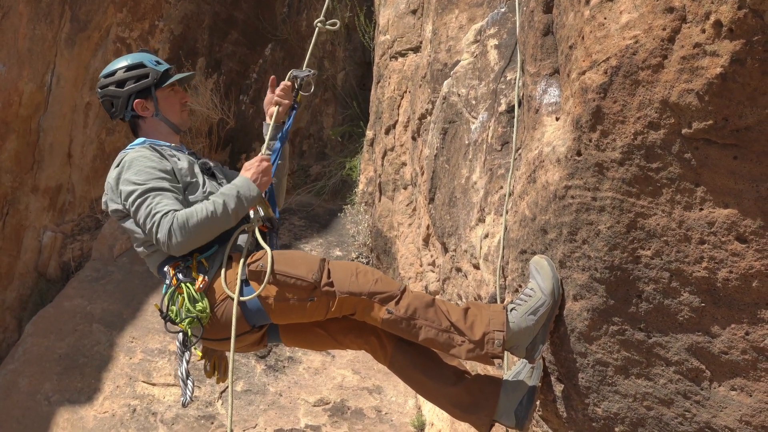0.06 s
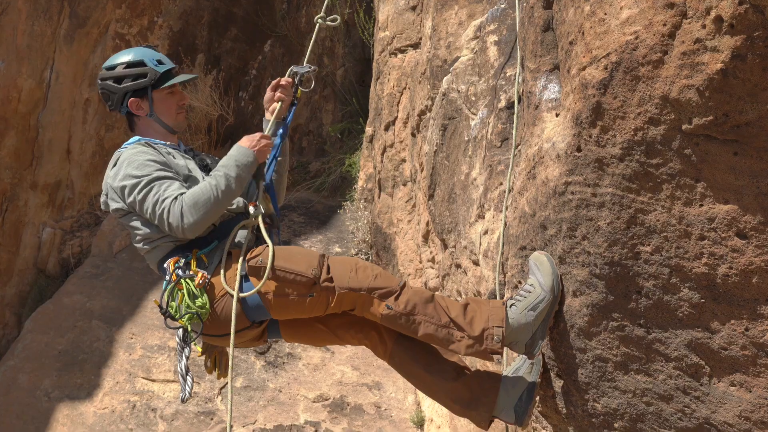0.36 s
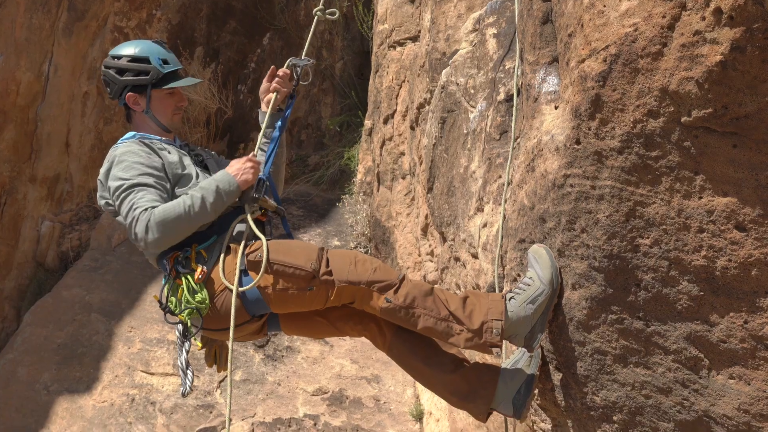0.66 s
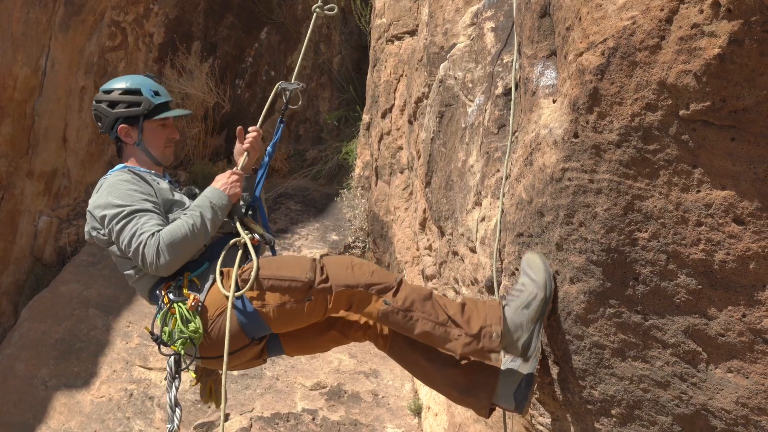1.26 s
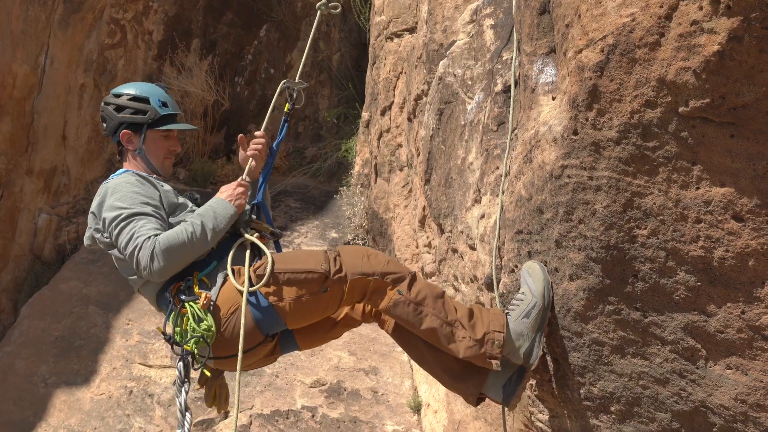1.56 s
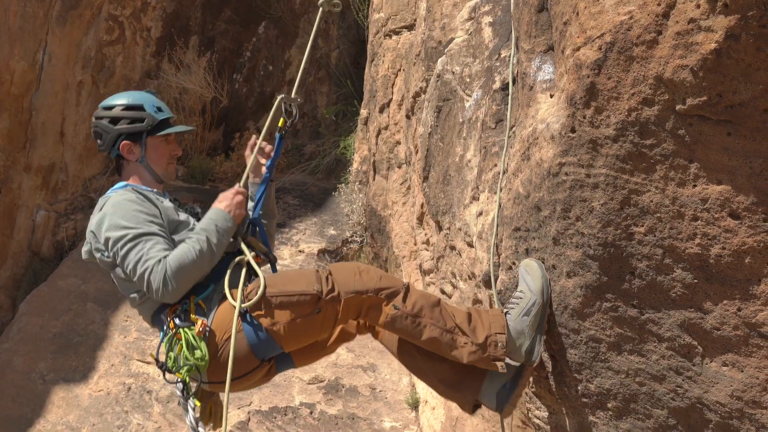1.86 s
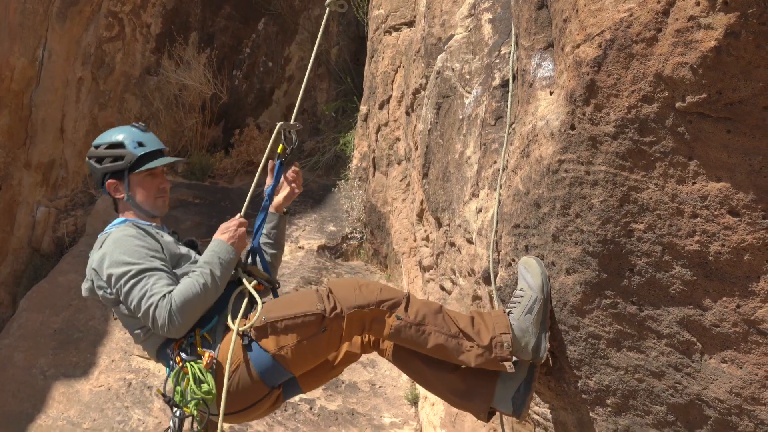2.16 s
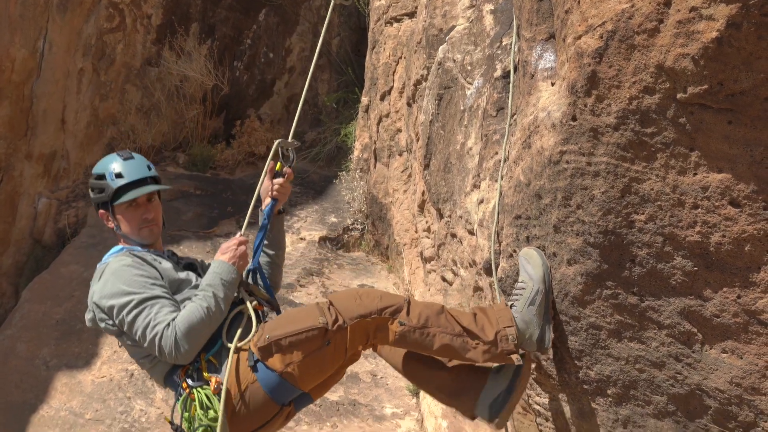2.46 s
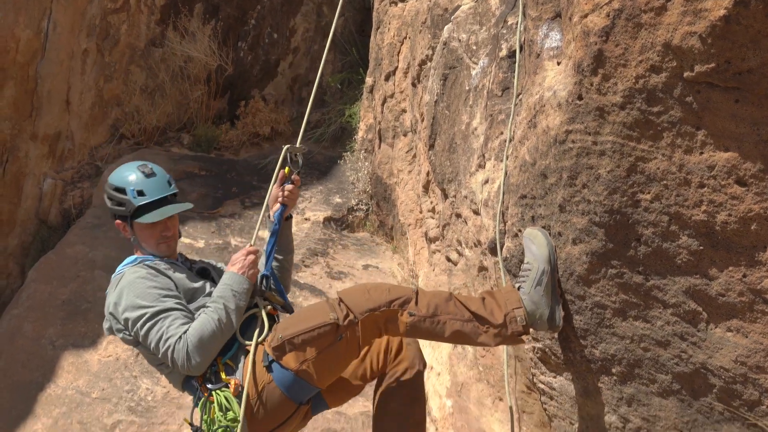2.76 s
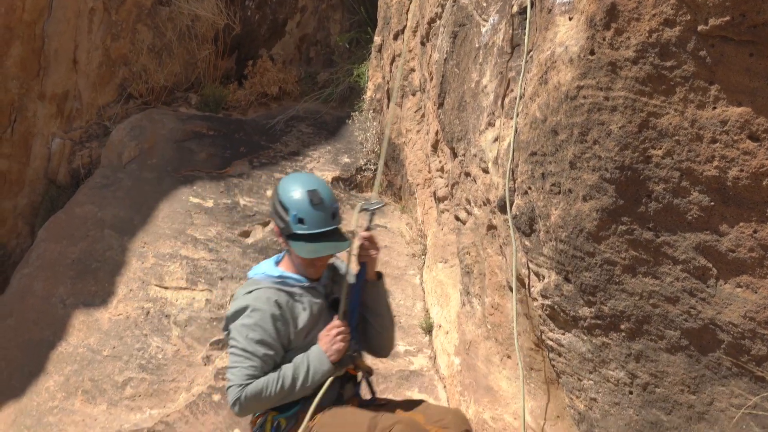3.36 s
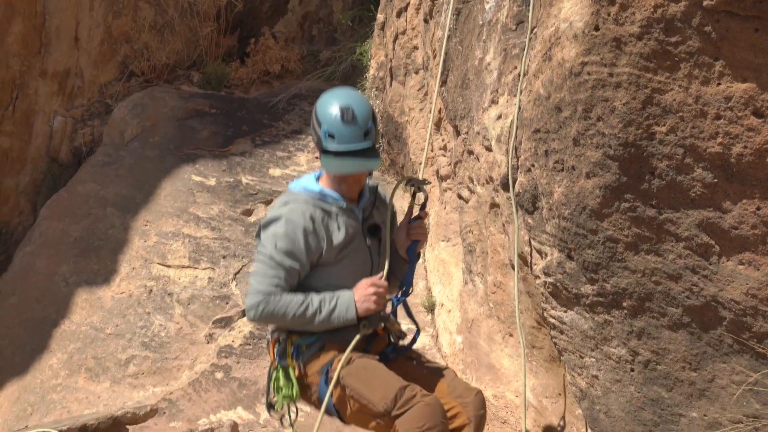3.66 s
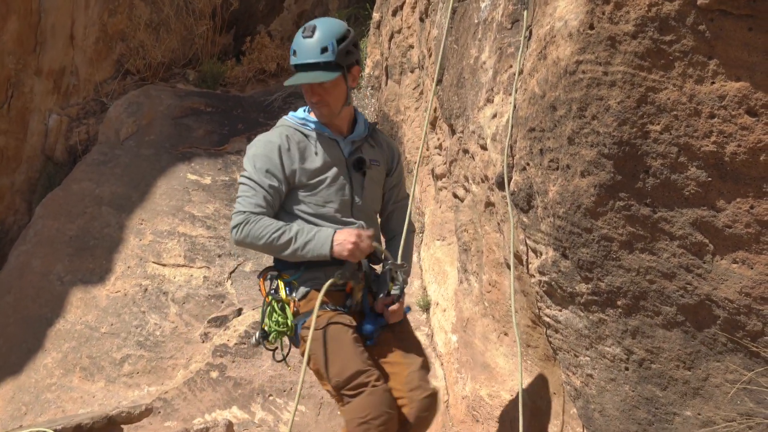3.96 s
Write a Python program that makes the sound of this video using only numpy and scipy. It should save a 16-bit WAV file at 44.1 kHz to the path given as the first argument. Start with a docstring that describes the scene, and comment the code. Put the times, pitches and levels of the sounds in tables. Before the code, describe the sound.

Soft surges of rope sliding through a belay device as carabiners clink and shoes knock.

```python
"""Outdoors at a sandstone wall, a climber lowers down. Rope hisses and rasps in surges as its fibres
slip through a metal belay device. Carabiners, a buckle and the device snap and ring as metal meets
metal. Rubber soles knock on the rock, shoes and clothing scuff, and a woven sling zips over an edge
near the end. The wall throws these hits back; under it all lie a faint rustle and low open air."""
import sys
import numpy as np
from scipy import signal
from scipy.fft import rfft, irfft
from scipy.io import wavfile
from scipy.ndimage import uniform_filter1d

SR = 44100
rng = np.random.default_rng(int(sys.argv[2]) if len(sys.argv) > 2 else 0)


def put_to_file(sound):
    """Save the sound as 16-bit audio at rate SR, in the file named by the first command-line argument."""
    columns = np.atleast_2d(sound).T  # one column per channel
    safe = np.clip(columns, -1, 1)
    whole_steps = np.round(safe * 32767)
    wavfile.write(sys.argv[1], SR, whole_steps.astype(np.int16))


N = 176400
T = np.arange(N) / SR

# Rope surges, levels before the layer trims
# (start [s], end [s], hiss [dB], treble [dB], rasp [dB], rasp centre [Hz])
ROPE_SURGES = [(-.05, 0.095, -47.5, -47, -44.5, 3780), (0.213, .35, -67, -63, -63, 3570),
               (0.418, 0.493, -56, -61, -52, 3150), (0.493, .56, -52.5, -58, -41.5, 3280),
               (.56, .65, -48.5, -52.5, -44.5, 3770), (.65, 0.771, -50.5, -51, -44.5, 3500),
               (0.836, 0.96, -54, -57, -54.5, 3360), (1.015, 1.082, -50.5, -73.5, -47, 3500),
               (1.1, 1.17, -60, -50.5, -48, 3150), (1.166, 1.234, -65, -52.5, -59, 3170),
               (1.247, 1.365, -59, -63, -49, 2960), (1.448, 1.583, -51, -56, -48.5, 3150),
               (1.64, 1.78, -61, -58.5, -52.5, 3060), (1.81, 1.884, -45.5, -55, -44.5, 4600),
               (1.918, 2, -45, -47, -42, 3050), (2.006, 2.152, -47.5, -51, -46, 3180),
               (2.15, 2.274, -51, -55.5, -46, 3030), (2.305, 2.45, -51.5, -53.5, -49.5, 3115),
               (2.451, 2.6, -46, -48.5, -45.5, 3330), (2.605, 2.713, -51, -62, -50, 3130),
               (2.698, 2.864, -47.5, -53.5, -50, 3200), (2.872, 3.132, -43, -47, -45.5, 3320),
               (3.124, 3.297, -41, -47.5, -42, 3330), (3.29, 3.377, -44, -51, -46.5, 3500),
               (3.378, 3.48, -50.5, -60, -48.5, 3160), (3.487, 3.615, -48, -57, -55, 3480),
               (3.65, 3.748, -57.5, -61, -50, 3000), (3.874, 4.05, -56, -48, -55, 3400)]
# EQ of the rope's wide hiss (frequency [Hz], gain [dB])
HISS_EQ = [(600, -22), (1100, -13), (1700, -2.5), (2200, -2), (4200, -2), (6500, -1.5), (9500, -7),
           (12000, -11.5), (16000, -40)]
# EQ of the rope's fine top end (frequency [Hz], gain [dB])
TREBLE_EQ = [(6000, -24), (9000, -4), (11500, -5), (14500, -1), (16000, -11)]
# Metal hits (time [s], piece, snap gain [dB], snap centre [Hz], ring gain [dB], ring centre [Hz])
METAL_HITS = [(.008, "carabiner", -25.5, 3780, -33, 7200), (.033, "carabiner", -31, 5900, -27.5, 9960),
              (.059, "carabiner", -24, 5900, -18.5, 10030), (0.0624, "carabiner", -22, 8000, -26, 7200),
              (.068, "carabiner", -12.5, 7840, -22, 5920), (0.081, "carabiner", -40, 8600, -35, 3900),
              (.169, "carabiner", -30.5, 1840, -32.5, 7490), (0.341, "carabiner", -30.5, 5130, -35.5, 7300),
              (0.434, "carabiner", -40, 7960, -38.5, 5270), (.528, "device", -17.5, 9250, -30.5, 3050),
              (0.6551, "device", -28, 6800, -40, 10700), (0.8902, "carabiner", -18.5, 5840, -23, 9960),
              (.915, "carabiner", -47, 9900, -38, 5270), (0.937, "carabiner", -28.5, 5650, -30.5, 3560),
              (.946, "carabiner", -36, 7500, -36.5, 5270), (.951, "carabiner", -28, 6840, -53.5, 5270),
              (0.986, "carabiner", -31, 2340, -32.5, 5530), (1.009, "carabiner", -21, 7750, -36, 7300),
              (1.047, "carabiner", -33, 7500, -39, 5270), (1.1489, "carabiner", -29, 3600, -35.5, 5300),
              (1.226, "carabiner", -37, 7340, -46, 5270), (1.255, "carabiner", -43, 6500, -61, 9960),
              (1.326, "carabiner", -39.5, 6060, -56, 5270), (1.579, "carabiner", -35.5, 3180, -58.5, 3560),
              (1.818, "device", -23.5, 8670, -39, 9300), (1.845, "carabiner", -21, 8000, -36.5, 5270),
              (2.335, "carabiner", -33.5, 7300, -44, 5270), (3.002, "carabiner", -27, 8300, -48, 8150),
              (3.505, "carabiner", -30, 7700, -49, 8150), (3.553, "buckle", -33, 9200, -44, 6570),
              (3.596, "buckle", -32, 12300, -43.5, 3830), (3.655, "carabiner", -32, 3020, -40.5, 5270),
              (3.671, "carabiner", -33, 5600, -38, 7200), (3.6905, "carabiner", -27, 5300, -36, 7200),
              (3.729, "buckle", -31.5, 3640, -34, 14100), (3.733, "buckle", -34, 8600, -33.5, 6570),
              (3.776, "buckle", -45.5, 11020, -52, 8700), (3.884, "carabiner", -30, 7100, -30.5, 7300),
              (3.898, "carabiner", -32, 3700, -38, 3520), (3.932, "device", -24, 2800, -48, 5000),
              (3.939, "device", -20, 11100, -19, 12340), (3.941, "device", -20.5, 9460, -35, 6040),
              (3.9668, "device", -21, 6800, -22, 10740), (3.980, "device", -27, 7200, -30, 10740),
              (3.987, "device", -22, 9000, -49, 10740)]
# Ringing modes of each piece (frequency [Hz], gain [dB], t60 [s])
GEAR_MODES = {"carabiner": [(2260, -3, .025), (3710, -5, 0.033), (3810, -5.5, .04), (5305, 0, 0.046),
              (5920, 3.5, 0.022), (7200, -0.5, 0.052), (8050, 7, 0.02), (9890, -1, .045),
              (11200, 2.5, .03)], "buckle": [(3830, 8, 0.032), (6573, -2.5, 0.043), (8680, 0, 0.077),
              (10100, 2, 0.041), (14100, -5, 0.061)], "device": [(2970, 1.5, 0.024), (5060, -15, 0.13),
              (5990, 3.5, 0.041), (9740, 2.5, 0.029), (10700, -4, 0.072), (12330, -1, 0.029),
              (13800, 4, .05)]}
# Base EQ of a metal contact (frequency [Hz], gain [dB])
SNAP_EQ = [(200, -1), (1000, -6.5), (3000, -0.5), (6000, -0.5), (8500, 1.5), (11000, 0), (16000, -3)]
# Shoes landing on rock (time [s], gain [dB], pitch [Hz])
FOOT_KNOCKS = [(1.359, -31.5, 1320), (1.394, -33, 710), (1.579, -37.5, 1480), (2.134, -29.5, 392),
               (3.18, -20, 830), (3.184, -21.5, 493), (3.196, -25, 755), (3.201, -31, 525),
               (3.215, -24, 560), (3.262, -22, 890), (3.349, -23.5, 490), (3.358, -33, 500),
               (3.386, -32, 614), (3.483, -26.5, 1000), (3.655, -5.5, 608)]
# Modes of a rubber sole (frequency / pitch [ratio], gain [dB], t60 [s])
SOLE_MODES = [(.77, -6, 0.036), (1.75, -12, 0.039)]
# Scrapes of shoes and clothing (start [s], length [s], level [dB], centre [Hz])
SCUFF_STROKES = [(0, 0.14, -41.5, 1480), (.06, 0.052, -42.5, 450), (0.861, 0.15, -49, 302),
                 (1.122, 0.072, -43, 1580), (1.359, 0.05, -40.5, 1010), (1.811, 0.15, -40.5, 730),
                 (1.883, 0.09, -43, 756), (1.948, 0.057, -41, 624), (2.117, .05, -41.5, 443),
                 (2.472, 0.043, -40.5, 990), (2.966, 0.05, -35.5, 615), (3.18, 0.061, -30, 660),
                 (3.231, 0.21, -41.5, 694), (3.342, 0.097, -34, 510), (3.452, 0.082, -37, 646),
                 (3.476, 0.051, -34.5, 1060), (3.52, 0.31, -42, 650), (3.662, 0.026, -31.5, 620),
                 (3.699, 0.27, -53.5, 810), (3.861, 0.042, -41.5, 1200), (3.899, 0.18, -40.5, 1230)]
# EQ of a scrape (frequency / centre [ratio], gain [dB])
SCUFF_EQ = [(.1, -7), (.4, -1.5), (.7, 1), (1.4, -1), (1.9, -9), (3, -11), (12, -35)]
# Harmonics of the sling's buzz, fundamental first (relative level [dB])
ZIP_HARMONICS = [7, 5, -5, -28.5]
# EQ of cloth and gear being handled (frequency [Hz], gain [dB])
RUSTLE_EQ = [(500, -8), (1100, 6), (2200, 15), (4500, -1), (8000, -31), (11000, -21), (14500, 4),
             (16000, -19)]
# EQ of the open-air bed (frequency [Hz], gain [dB])
AIR_EQ = [(12, -39), (20, -7.5), (75, -10.5), (118, -3.5), (191, -8.5), (265, -8.5), (291, -10.5),
          (356, -7.5), (563, -12.5), (1050, -15), (1600, -24.5), (2080, -42), (3520, -120)]
# Second EQ on that bed, trimming both ends (frequency [Hz], gain [dB])
AIR_TRIM_EQ = [(15, -20), (35, 0.5), (1100, -0.5), (2000, 4.5), (5000, -16), (16000, -30)]


def rope(rise_s=.07, fall_s=.081, hiss_trim_db=2, treble_trim_db=1, rasp_trim_db=-3):
    """Sheath fibres slip over metal in surges: a wide hiss, a fine treble and a rasping resonance."""
    start, end, hiss_db, treble_db, rasp_db, rasp_hz = np.transpose(ROPE_SURGES)
    fade_in = np.clip((T - start[:, None]) / rise_s + .5, 0, 1)
    fade_out = np.clip((end[:, None] - T) / fall_s + .5, 0, 1)
    feed = fade_in * fade_out
    feed = feed ** 2 * (3 - 2 * feed)  # round off the fades
    hiss_env, treble_env, rasp_env = (np.sqrt(amp(db) ** 2 @ feed)
                                      for db in (hiss_db, treble_db, rasp_db))
    hiss_env = np.hypot(hiss_env, amp(-58.5))  # the rope creeps between surges
    slips = [grains(N, per_s=16000, spread_db=1.46) for _ in range(3)]
    flutter_db = .84 * wobble(smooth_samples=500)
    hiss = amp(hiss_trim_db) * hiss_env * colour(slips[0], HISS_EQ)
    treble = amp(treble_trim_db) * treble_env * colour(slips[1], TREBLE_EQ)
    sweep_hz = np.interp(T, (start + end) / 2, rasp_hz)
    rasp = amp(rasp_trim_db) * rasp_env * unit(resonate(slips[2], sweep_hz, width_hz=1000))
    return amp(flutter_db) * (hiss + treble + rasp)


def clink(piece, snap_db, snap_hz, ring_db, ring_hz, attack_s=.0009, snap_s=.0011, tail_s=.0056):
    """A hard contact snaps, then the piece rings on, favouring the modes near the ring centre."""
    t = T[:SR // 6]
    f = np.fft.rfftfreq(len(t), 1 / SR)
    boost_db = 17.5 / (1 + ((f - snap_hz) / 420) ** 2)
    cutoff_hz = 1.84 * max(snap_hz, 6500)
    spectrum = amp(read(SNAP_EQ, f) + boost_db) / np.hypot(1, (f / cutoff_hz) ** 4)
    chatter = unit(irfft(spectrum * np.exp(2j * np.pi * rng.random(len(f))), len(t)))
    attack = np.minimum(t / attack_s, 1)
    contact = attack * (np.exp(-(t / snap_s) ** 2 / 2) + amp(-13.5) * np.exp(-t / tail_s))
    snap = unit(chatter * contact) * np.sqrt(np.mean(contact ** 2))
    ring = 0
    for hz, db, t60 in GEAR_MODES[piece]:
        emphasis = .23 + np.exp(-((hz - ring_hz) / 290) ** 2)
        detuned_hz = hz * (1 + .0064 * rng.standard_normal())
        ring += emphasis * amp(db - 60 * t / t60) * np.sin(2 * np.pi * (detuned_hz * t + rng.random()))
    return amp(snap_db) * snap + amp(ring_db) * attack * ring


def knock(db, hz, attack_s=.00068):
    """A rubber sole meets rock: a pop of a few cycles and two well-damped modes."""
    t = T[:SR // 12]
    u = t / attack_s
    pop = (u / 2) ** 2 * np.exp(2 - u) * np.sin(2 * np.pi * hz * t)
    sole = sum(amp(mode_db - 60 * t / t60) * np.sin(2 * np.pi * hz * ratio * t)
               for ratio, mode_db, t60 in SOLE_MODES)
    return amp(db) * (pop + (1 - np.exp(-u)) ** 2 * sole)


def scuff(length, db, hz):
    """A shoe or cloth scrapes: gritty friction that swells quickly and dies away."""
    t = T[:SR // 4]
    stroke = np.interp(t / length, [0, .067, 1], [0, 1, 0]) ** .65
    grit = grains(len(t), per_s=4500, spread_db=3.5)
    return amp(db) * stroke * colour(grit, SCUFF_EQ, hz)


def sling(length_s=.05, from_hz=720, to_hz=1464, jitter=.088):
    """The weave ticks over a metal edge ever faster: a short, rough, rising zip."""
    progress = np.arange(0, length_s, 1 / SR) / length_s
    waver = 1 + jitter * wobble(smooth_samples=60)[:len(progress)]
    cycles = np.cumsum(from_hz * (to_hz / from_hz) ** progress * waver) / SR
    buzz = sum(amp(db) * np.sin(2 * np.pi * k * cycles) for k, db in enumerate(ZIP_HARMONICS, 1))
    return amp(-36) * np.sin(np.pi * progress) ** .9 * unit(buzz)


def wall(x, echo_s=.0046, predelay_s=.009, t60=.12):
    """The rock face returns one close echo, then a brief scattered tail."""
    t = T[:SR // 4]
    taps = rng.standard_normal(len(t)) * (rng.random(len(t)) < 3000 / SR)
    taps *= (t > predelay_s) * amp(-60 * t / t60)
    echo = np.interp(T - echo_s, T, x, left=0)
    tail = signal.fftconvolve(x, taps / np.linalg.norm(taps))[:N]
    return amp(-25.5) * echo + amp(-30) * tail


def rustle():
    """Cloth and harness keep up a faint crackle as they are handled."""
    return amp(-58.5) * colour(grains(N, per_s=5000, spread_db=2.5), RUSTLE_EQ)


def air():
    """A low, steady bed of outdoor air."""
    bed = colour(rng.standard_normal(N), AIR_EQ)
    return amp(-49) * colour(bed, AIR_TRIM_EQ)


def grains(n, per_s, spread_db):
    """The raw texture of friction: tiny random slips of uneven size."""
    slips = rng.standard_normal(n) * (rng.random(n) < per_s / SR)
    return slips * amp(spread_db * np.minimum(rng.exponential(1, n), 4))


def wobble(smooth_samples):
    """A smoothed random modulator at rms 1."""
    return unit(uniform_filter1d(rng.standard_normal(N), size=smooth_samples))


def resonate(x, hz, width_hz):
    """A band-pass swept along the curve hz."""
    carrier = np.exp(2j * np.pi * np.cumsum(hz) / SR)
    r = np.exp(-np.pi * width_hz / SR)
    return 2 * (carrier * signal.lfilter([(1 - r) ** 2], [1, -2 * r, r * r], x / carrier)).real


def colour(x, eq, scale_hz=1):
    """Runs x through an EQ curve and normalises to rms 1."""
    f = np.fft.rfftfreq(len(x), 1 / SR)
    return unit(irfft(rfft(x) * amp(read(eq, f / scale_hz)), len(x)))


def read(eq, hz):
    """An EQ curve's gain in dB, interpolated over log frequency."""
    f, db = np.transpose(eq)
    return np.interp(np.log(hz + 1e-6), np.log(f), db)


def amp(db):
    """Decibels to gain."""
    return 10 ** (np.asarray(db) / 20)


def unit(x):
    """Normalises to rms 1."""
    return x / np.sqrt(np.mean(x ** 2) + 1e-20)


def add(mix, start_s, sound):
    """Drops a sound into the mix at its cue."""
    part = mix[max(round(start_s * SR), 0):][:len(sound)]
    part += sound[:len(part)]


def scene():
    """The mono mix: rope, rustle and air stay dry; only the hits are sent to the wall."""
    continuous = rope() + rustle() + air()
    hits = np.zeros(N)
    for source, cues in ((clink, METAL_HITS), (knock, FOOT_KNOCKS), (scuff, SCUFF_STROKES)):
        for start_s, *settings in cues:
            add(hits, start_s, source(*settings))
    add(hits, start_s=3.903, sound=sling())
    return (continuous + hits + wall(hits))[None]


def record(dry):
    """A steep low-pass at 16.25 kHz takes the very top off the mix."""
    lowpass = signal.firwin(255, 16250, window=("kaiser", 8), fs=SR)
    return signal.oaconvolve(dry, lowpass[None], "same")


dry = scene()
out = record(dry)
put_to_file(out)
```